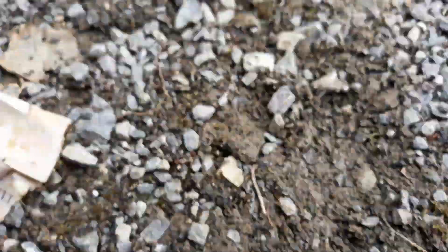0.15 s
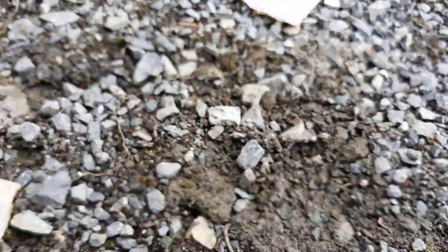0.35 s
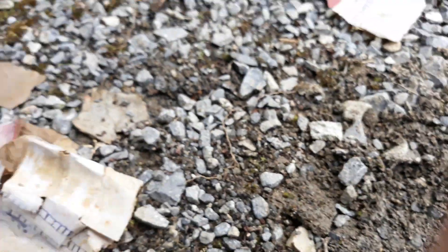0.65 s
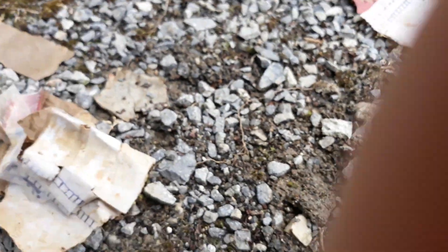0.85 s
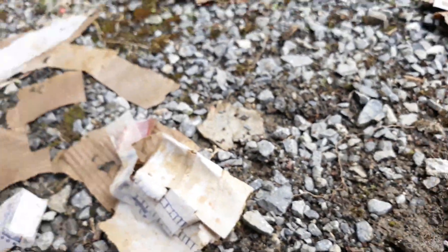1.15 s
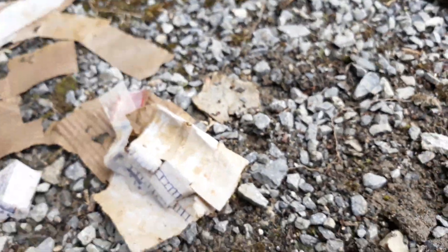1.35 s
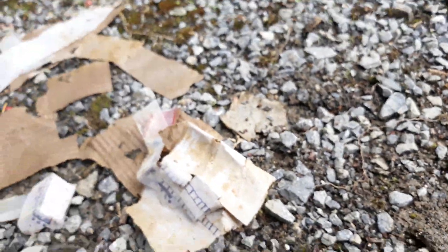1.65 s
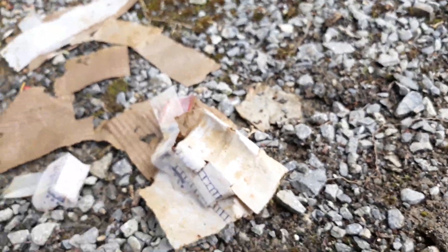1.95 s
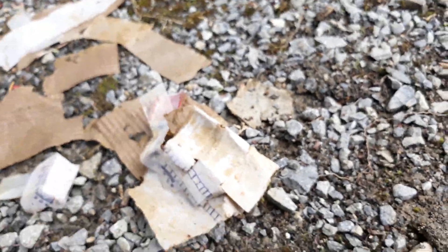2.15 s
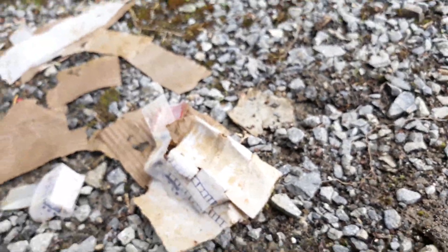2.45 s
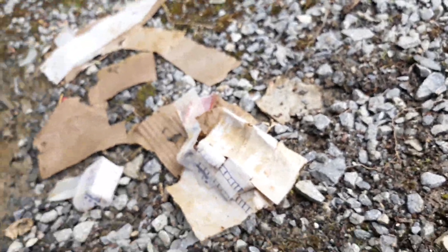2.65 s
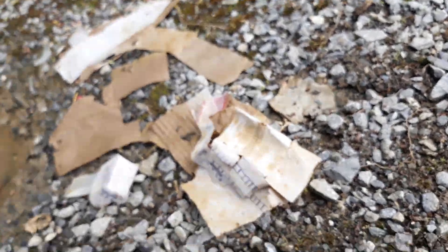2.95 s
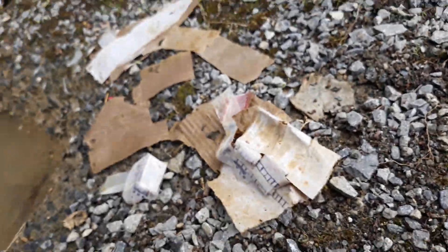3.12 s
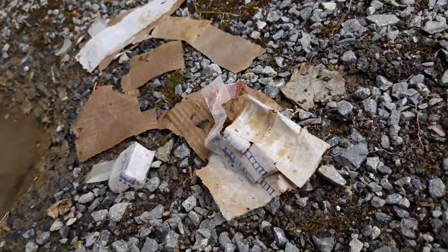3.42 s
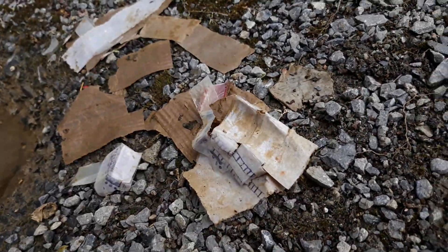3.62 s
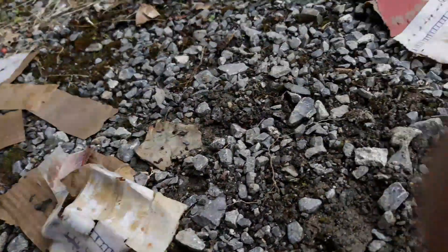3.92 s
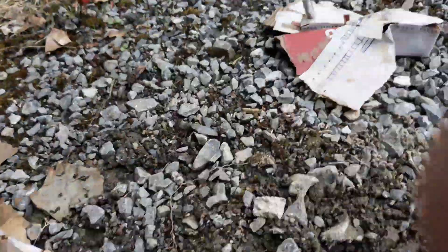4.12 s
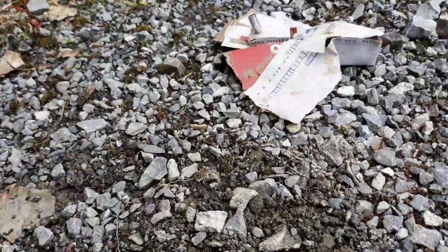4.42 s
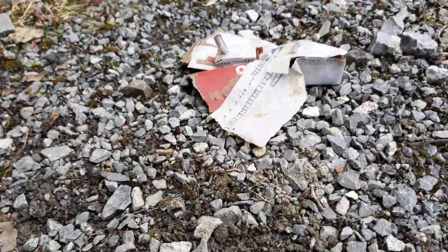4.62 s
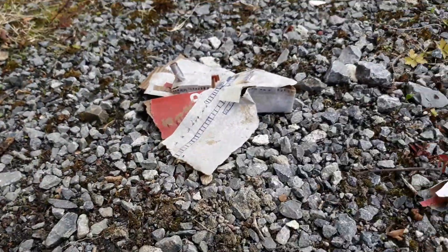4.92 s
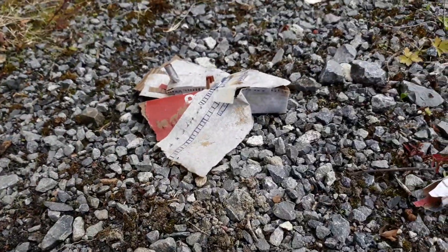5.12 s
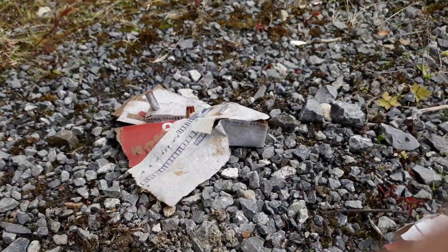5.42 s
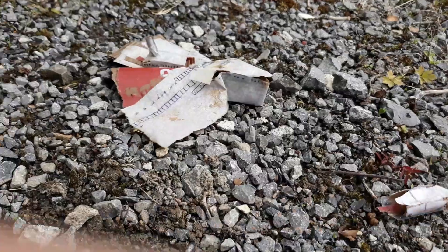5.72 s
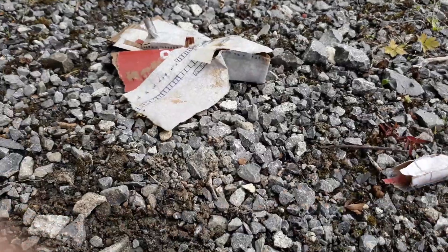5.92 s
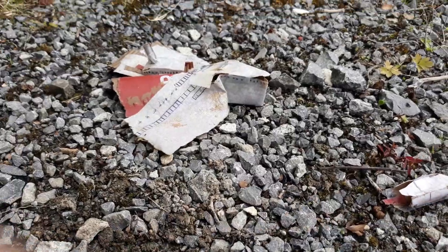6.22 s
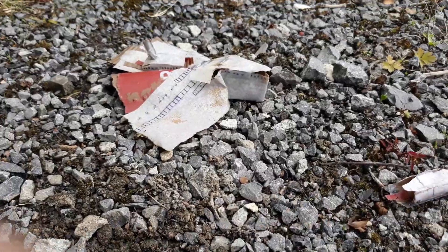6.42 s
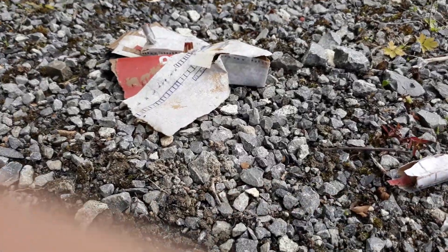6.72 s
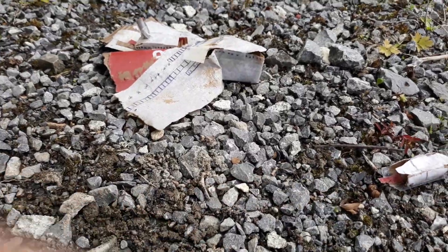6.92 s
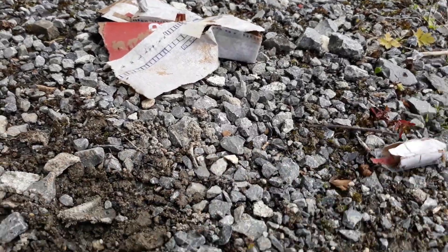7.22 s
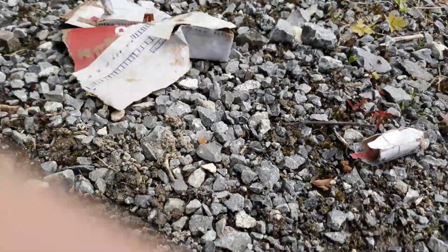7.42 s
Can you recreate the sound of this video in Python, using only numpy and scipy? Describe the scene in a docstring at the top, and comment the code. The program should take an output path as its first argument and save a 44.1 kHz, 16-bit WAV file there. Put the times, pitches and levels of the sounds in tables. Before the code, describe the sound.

Fingers shift their grip on a device, skin dragging beside the microphone. Light slides give way to abrupt crunchy scrapes and casing ticks, then grainy rubbing and heavy low scuffs. After a lull of faint outdoor rumble and hiss, a few clicks and bumps return, ending with a hard snap, scrapes and a dull thump.

```python
"""Above a quiet gravel path, fingers shift their grip on a hand-held recorder.
Skin drags over the casing beside the microphone port: noise made of tiny slips, swelling with each stroke.
Firm scrapes, gritty rubs and light hissing slides also sound the air pocket under the finger.
The casing ticks with short rings, and fingertip taps and dull bumps push it in single low swings.
A faint outdoor rumble and hiss lies underneath."""
import sys
import numpy as np
from scipy import signal
from scipy.fft import rfft, irfft, next_fast_len
from scipy.io import wavfile

SR = 44100
rng = np.random.default_rng(int(sys.argv[2]) if len(sys.argv) > 2 else 0)


def put_to_file(sound):
    """Save the sound as 16-bit audio at rate SR, in the file named by the first command-line argument."""
    columns = np.atleast_2d(sound).T  # one column per channel
    safe = np.clip(columns, -1, 1)
    whole_steps = np.round(safe * 32767)
    wavfile.write(sys.argv[1], SR, whole_steps.astype(np.int16))


N = 333396
TIME = np.arange(N) / SR  # seconds

# colour of the still air: (frequency [Hz], relative level per Hz [dB])
AIR_COLOUR = [(35.0, -5), (100.0, 2), (180.0, -6), (350.0, -16.5), (1000.0, -21), (2200.0, -26),
              (3800.0, -17.5), (6000.0, -25.5), (9500.0, -33.5), (15000.0, -20)]
# loudness of the still air, which sinks briefly: (time [s], level [dB])
AIR_LEVEL = [(0, -63), (4.95, -66), (5.05, -70), (5.28, -73), (5.36, -67.5), (7.56, -61)]
# dull bumps as the grip settles: (time [s], level [dB])
BUMPS = [(0.947, -53), (1.272, -27.5), (1.676, -35), (2.08, -34.5), (2.274, -46), (2.425, -34),
         (2.548, -27), (4.59, -52.5), (5.161, -54.5), (5.196, -56), (5.3, -56), (5.355, -54.5),
         (5.493, -42), (5.967, -52), (6.503, -44), (6.567, -35), (6.912, -38), (6.97, -34.5), (7.515, -23)]
# casing ticks, each with a low fingertip tap: (time [s], relative level [dB], ring [Hz])
TICKS = [(0.142, -31, 7600), (0.1971, -26, 3360), (1.4686, -9.5, 2400), (1.4718, -26, 2250),
         (1.501, -11.5, 3000), (1.674, -32, 2520), (1.6781, -16, 3700), (1.7965, -14, 3200),
         (1.8808, -12, 3150), (2.0801, -46, 547), (2.2105, -32.5, 3770), (2.2736, -22.5, 2900),
         (2.3444, -21.5, 3620), (2.4243, -10.5, 3230), (2.7202, -20, 5100), (3.057, -22, 3840),
         (3.099, -21.5, 1380), (3.384, -39, 3520), (3.416, -25.5, 2190), (3.4232, -28, 1810),
         (3.4269, -28, 970), (3.4608, -34, 1280), (3.505, -34, 3450), (3.906, -26.5, 5030),
         (4.2315, -24.5, 960), (4.408, -36, 5530), (4.5264, -28, 5050), (4.5882, -36, 2590),
         (5.8153, -31, 4960), (6.4998, -36, 2340), (6.5544, -8.5, 3130), (6.866, -43.5, 1780),
         (6.9091, -17.5, 3300), (6.9483, -18, 3150), (6.9533, -24, 1200), (6.9689, -16, 3770),
         (7.248, -14, 1570), (7.2547, 2, 3900), (7.3337, -5.5, 1470)]
# colours of the three kinds of friction: (frequency [Hz], relative level per Hz [dB])
SCRAPE_COLOUR = [(35, -16.5), (80, -4), (150, -1), (340, -2.5), (650, -6), (1200, -9), (2200, -15),
                 (4200, -15.5), (6500, -21.5), (9500, -46), (13000, -32)]
RUB_COLOUR = [(35, -34), (100, -26), (700, -13), (1500, -9.5), (2500, -3.5), (3500, -1), (4500, -1),
              (6000, -17.5), (8000, -36), (9800, -31), (13000, -27.5)]
SLIDE_COLOUR = [(35, -20.5), (100, -8.5), (300, -17), (1300, -36.5), (2200, -15), (3300, -8), (4400, 0),
                (6000, 1), (7500, 0.5), (8700, -3), (9800, -11), (12000, -2.5), (15500, -6.5)]
# firm scrapes across the port: (crest [s], rise [s], fall [s], level [dB], air pocket [Hz],
# pocket relative to the level [dB], fine hiss relative to the level [dB])
SCRAPES = [(0.27, 0.17, .25, -56.5, 1640, -3, -4), (1.277, 0.0098, 0.016, -33.5, 5000, -1.5, 4.5),
           (1.337, .031, .054, -22.5, 4850, 2, -0.5), (1.371, .043, .035, -12, 1150, -4, -20.5),
           (1.427, 0.016, .018, -35, 1390, -1, -24), (1.755, 0.0018, 0.04, -34.5, 3530, 1.5, -7),
           (2, .107, .018, -34, 351, -8.5, -14), (2.091, .03, 0.038, -59.5, 3900, -21, -14),
           (2.462, 0.049, 0.037, -36, 2160, -2, -14), (2.509, .025, 0.044, -21.5, 1540, -3, -18),
           (2.529, 0.024, .018, -19.5, 400, 2, -15), (2.61, .061, .02, -29.5, 4350, 1.5, -8),
           (2.672, 0.0026, .077, -34.5, 4670, -3, -6.5), (2.824, .043, .11, -54.5, 350, -4, -13),
           (3.162, .126, .071, -41, 2620, -7.5, -16), (3.841, .038, .015, -16, 750, -7.5, -13),
           (3.859, 0.052, .012, -21.5, 5140, -0.5, -5), (4.119, .023, 0.033, -19, 270, 4, 2),
           (4.142, 0.024, 0.025, -15, 358, 4, -4), (4.168, 0.02, .019, -13.5, 300, -1.5, -5),
           (4.26, .045, .03, -42, 700, -3, -26), (4.294, 0.28, .21, -53.5, 4750, 0.5, -4.5),
           (5.509, 0.097, .1, -60.5, 130, 3.5, -10), (7.273, 0.014, .066, -20, 1480, -2.5, -28),
           (7.32, 0.07, .034, -22, 4740, -8, -30), (7.445, .025, .04, -37, 305, -1, -7),
           (7.496, .02, .033, -27, 397, -17, -28)]
# gritty rubs on the casing: (crest [s], rise [s], fall [s], level [dB], air pocket [Hz],
# deep scrape relative to the level [dB])
RUBS = [(1.521, .107, 0.079, -43.5, 2290, -6), (1.607, .006, .055, -38.5, 4444, -19.5),
        (1.654, .021, 0.21, -41.5, 3730, -20.5), (1.674, .003, .011, -32.5, 3500, -10.5),
        (1.801, .007, .061, -36.5, 4020, -16), (1.896, 0.022, .06, -38, 4470, -7.5),
        (2.275, .06, 0.09, -55, 2670, -15), (2.37, 0.026, .05, -62, 2750, -11.5),
        (2.653, 0.22, 0.062, -45.5, 2300, -8), (2.9, 0.024, 0.12, -49.5, 1940, -25),
        (2.991, 0.056, .018, -45.5, 2010, -8.5), (3.054, .075, .046, -40.5, 1700, -19),
        (3.425, .035, .055, -50.5, 1010, -5), (3.667, .003, .011, -32.5, 3450, -5.5),
        (3.706, .04, .23, -39, 3224, -9), (3.795, 0.071, .07, -26, 3560, -11),
        (6.563, .01, .032, -47.5, 3300, -5.5), (6.597, .006, .017, -45.5, 3140, -9),
        (6.66, .17, .075, -55, 3340, -16.5), (6.872, .03, .03, -57.5, 2950, -11),
        (6.923, .014, 0.044, -41.5, 2970, -12), (6.962, .007, .012, -35, 3170, -10.5),
        (7.06, .12, .15, -58.5, 2900, -12), (7.25, .13, .014, -43, 2340, -21),
        (7.395, .05, .02, -55.5, 6000, 0.5), (7.548, .007, .085, -49, 1550, -17.5)]
# light hissing slides: (crest [s], rise [s], fall [s], level [dB], air pocket [Hz],
# pocket relative to the level [dB])
SLIDES = [(0.11, .21, .094, -59.5, 1730, -11), (0.14, 0.024, .15, -51, 8400, -6.5),
          (0.47, 0.36, 0.16, -54, 3900, -4), (0.617, 0.0046, .11, -55.5, 4560, 0.5),
          (0.68, .06, .08, -49, 4480, -20), (0.772, .042, .1, -48, 3500, -8.5),
          (1.04, .215, .13, -46, 3150, -6), (1.09, .025, .07, -46.5, 4060, -3),
          (1.268, .053, .012, -35, 4260, -8.5), (4.02, .21, 0.17, -53.5, 6635, -0.5),
          (4.0, .2, .22, -57.5, 2290, 6.5), (4.592, .088, 0.2, -56, 4600, 3.5),
          (4.859, 0.34, .2, -65, 3570, 0), (5.485, .135, .13, -46, 3845, -4),
          (5.81, .3, 0.09, -63, 4400, -8), (6.0, 0.23, 0.44, -75.5, 6800, 0),
          (6.345, .07, .08, -59.5, 4206, -7), (6.521, 0.17, .07, -65, 4100, 2),
          (7.445, 0.025, .033, -30, 8200, -5.5), (7.478, .04, 0.026, -22, 6400, -14)]

# fixed parts of each stroke's blend, relative to the stroke's level [dB]
SCRAPE_RUB_DB = -3.5
RUB_HISS_DB, RUB_POCKET_DB = -24.5, -4.5
SLIDE_SCRAPE_DB, SLIDE_RUB_DB = -24.5, -15.5
# the softer the touch, the lower it rings and the more it thuds
THUD_DB, THUD_AT_HZ, THUD_DB_PER_OCTAVE = -3, 1000, -14
CHATTER_DB = -26  # chatter behind a tick, at its start, relative to the snap
FULL_SCALE = .9  # largest level before the peaks are cut off
CUTOFF_HZ = 15950  # top of the microphone's range


def from_db(db):
    """Turn decibels into a plain gain."""
    return 10 ** (np.asarray(db) / 20)


def rms_one(x):
    """Scale a signal to an average strength (rms) of 1."""
    return x / np.sqrt(np.mean(x ** 2) + 1e-20)


def colour(x, spectrum):
    """Filter with the given spectrum and unit power gain, never sounding ahead of its input (minimum phase)."""
    size = 2 * next_fast_len(N)
    half = size // 2
    hz = np.maximum(np.arange(half + 1) * SR / size, 1)
    at_hz, level_db = np.transpose(spectrum)
    gain = from_db(np.interp(np.log(hz), np.log(at_hz), level_db))
    # folding the cepstrum onto positive times gives the minimum phase
    cepstrum = irfft(np.log(rms_one(gain)))
    cepstrum[1:half] *= 2
    cepstrum[half + 1:] = 0
    response = np.exp(rfft(cepstrum))
    return irfft(rfft(x, size) * response)[:N]


def resonate(x, hz, q):
    """A broad resonance, applied twice for steep skirts."""
    hz = min(hz, SR / 4)
    b, a = signal.iirpeak(hz, max(q, .6), fs=SR)
    once = signal.lfilter(b, a, x)
    return signal.lfilter(b, a, once)


def still_air():
    """A faint outdoor rumble and hiss: coloured noise with a slowly changing level."""
    level = from_db(np.interp(TIME, *np.transpose(AIR_LEVEL)))
    return level * colour(rng.standard_normal(N), AIR_COLOUR)


def thuds(rows, low_hz, high_hz, level_db):
    """Soft flesh pushes the casing once for each row (time [s], level [dB]): a single rounded swing."""
    band = signal.butter(2, [low_hz, high_hz], "band", fs=SR, output="sos")
    s, row_db = np.transpose(rows)
    pushes = np.full(N, 1e-18)
    pushes[(s * SR).astype(int)] = from_db(row_db + level_db)
    swing_peak = signal.sosfilt(band, signal.unit_impulse(SR)).max()
    return signal.sosfilt(band, pushes) / swing_peak


def bumps():
    """The settling grip pushes the casing in dull, low swings."""
    return thuds(BUMPS, low_hz=54, high_hz=240, level_db=0.0)


def taps():
    """A fingertip thud goes with every tick, stronger where the tick rings lower."""
    touches = []
    for s, db, hz in TICKS:
        octaves = np.log2(hz / THUD_AT_HZ)
        touches.append((s, db + THUD_DB + THUD_DB_PER_OCTAVE * octaves))
    return thuds(touches, low_hz=90, high_hz=700, level_db=0.5)


def ticks(width_hz=1800, tail_t60=0.021, dull_hz=7000, crack_db=-22.0, level_db=-3.0, size=2048):
    """The casing rings for about a millisecond, with a faint sharp edge and a short chatter behind it."""
    out, age = np.zeros(N + size), np.arange(size) / SR
    snap = signal.unit_impulse(size)
    soften = signal.butter(2, dull_hz, fs=SR, output="sos")
    # the chatter driving the ring falls 60 dB in tail_t60 seconds
    chatter_gain = from_db(CHATTER_DB - 60 * age / tail_t60)
    for s, tick_db, hz in TICKS:
        chatter = chatter_gain * rng.standard_normal(size)
        force = signal.sosfilt(soften, snap + chatter)
        # one width in Hz: all but the lowest pitches die equally fast
        ring = resonate(force, hz, hz / width_hz)
        tick = ring / np.abs(ring).max() + from_db(crack_db) * snap
        start = int((s - .5 / hz) * SR)
        out[start:start + size] += from_db(tick_db + level_db) * tick
    return out[:N]


def friction(grains_per_s, spread_db, grit_db):
    """Countless tiny slips merge into noise; coarser grains catch at random, more smoothly the denser they come."""
    sizes = from_db(spread_db * np.minimum(rng.exponential(1, N), 3))
    signs = rng.choice([-1, 1], N)
    catches = rng.random(N) < grains_per_s / SR
    grains = rms_one(sizes * signs * catches / np.sqrt(grains_per_s))
    return rms_one(rng.standard_normal(N) + from_db(grit_db) * grains)


def grab(rate_hz, depth_db):
    """Skin grabs and lets go unevenly: a fast random gain of rms 1."""
    slow = signal.butter(2, rate_hz, fs=SR, output="sos")
    wander = rms_one(signal.sosfilt(slow, rng.standard_normal(N)))
    return rms_one(from_db(depth_db * np.clip(wander, -2, 2)))


def dust(rub, speed, level_db=-21.0, edge_hz=6000):
    """Specks caught under the skin add a sparse, bright crackle to the rubbing."""
    specks = rub * friction(grains_per_s=70 * speed, spread_db=5.5, grit_db=18.5)
    bright = signal.butter(2, edge_hz, "high", fs=SR, output="sos")
    return from_db(level_db) * signal.sosfilt(bright, specks)


def swell(crest, rise, fall, roundness=1.77):
    """Samples and envelope of one stroke: 20 dB down one rise before and one fall after its crest."""
    span = slice(*np.searchsorted(TIME, [crest - 2 * rise, crest + 2 * fall]))
    since = TIME[span] - crest
    distance = np.abs(since) / np.where(since < 0, rise, fall)
    return span, from_db(-20 * distance ** roundness)


def strokes():
    """Each stroke's timing, level, pocket pitch and blend: relative dB of (scrape, rub, hiss, pocket)."""
    for *timing, db, hz, pocket_db, hiss_db in SCRAPES:
        yield timing, db, hz, (0, SCRAPE_RUB_DB, hiss_db, pocket_db)
    for *timing, db, hz, scrape_db in RUBS:
        yield timing, db, hz, (scrape_db, 0, RUB_HISS_DB, RUB_POCKET_DB)
    for *timing, db, hz, pocket_db in SLIDES:
        yield timing, db, hz, (SLIDE_SCRAPE_DB, SLIDE_RUB_DB, 0, pocket_db)


def fingers(pocket_q=2.2, firm_db=-31.5):
    """Each stroke mixes a deep scrape, a gritty rub and a fine hiss, and sounds the air pocket under the finger."""
    power, pockets = np.zeros((3, N)), np.zeros(N)
    slips = friction(grains_per_s=2500, spread_db=8.5, grit_db=-7.5)
    for timing, level_db, hz, blend_db in strokes():
        span, envelope = swell(*timing)
        *friction_gains, pocket_gain = from_db(level_db) * from_db(blend_db)
        # overlapping strokes add up in power
        power[:, span] += np.outer(friction_gains, envelope) ** 2
        hollow = resonate(slips[span], hz, pocket_q) * envelope
        envelope_rms = np.sqrt(np.mean(envelope ** 2))
        pockets[span] += pocket_gain * rms_one(hollow) * envelope_rms
    scrape, rub, slide = np.sqrt(power)
    # a louder stroke is a faster one: its grains crowd together
    speed = 1 + np.hypot(scrape, rub) / from_db(firm_db)
    # firm contact judders, a light slide runs smoothly
    judder = grab(rate_hz=100, depth_db=1.5)
    coarse_slips = friction(grains_per_s=500 * speed, spread_db=2.5, grit_db=-8.0)
    deep = colour(scrape * judder * coarse_slips, SCRAPE_COLOUR)
    gritty_slips = friction(grains_per_s=500 * speed, spread_db=9.0, grit_db=-3.0)
    gritty = colour(rub * judder * gritty_slips, RUB_COLOUR)
    fine_slips = friction(grains_per_s=5900, spread_db=4.5, grit_db=-13.5)
    fine = colour(slide * fine_slips, SLIDE_COLOUR)
    return deep + gritty + fine + pockets + dust(rub, speed)


def scene():
    """Strokes, ticks, taps and bumps reach the microphone dry, over the still air."""
    mix = still_air() + bumps() + taps() + ticks() + fingers()
    return mix[None]  # one channel


def record(dry, bass_cut_hz=45):
    """The microphone sheds deep bass, peaks are cut off at full scale, then the top is removed."""
    bass_cut = signal.butter(2, bass_cut_hz, "high", fs=SR, output="sos")
    thin = signal.sosfilt(bass_cut, dry)
    clipped = np.clip(thin, -FULL_SCALE, FULL_SCALE)
    top_cut = signal.ellip(12, .1, 80, CUTOFF_HZ, fs=SR, output="sos")
    return signal.sosfilt(top_cut, clipped)


dry = scene()
out = record(dry)
put_to_file(out)
```